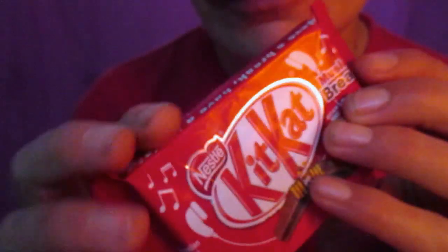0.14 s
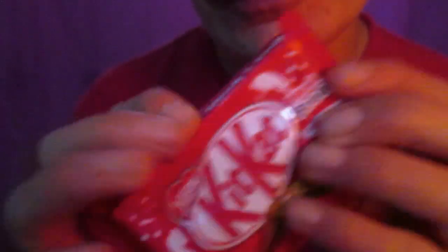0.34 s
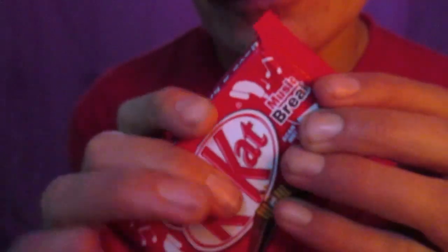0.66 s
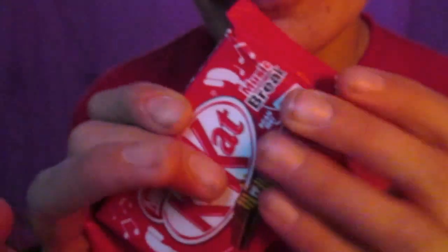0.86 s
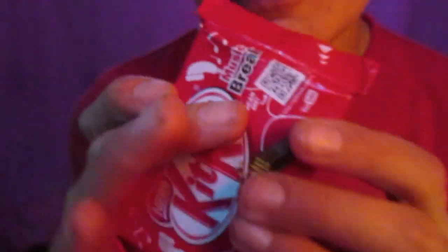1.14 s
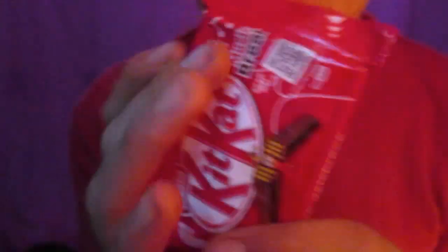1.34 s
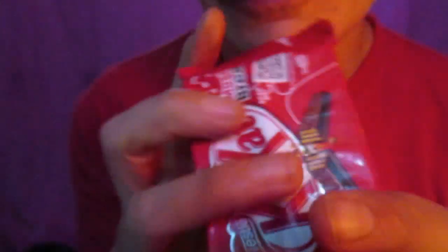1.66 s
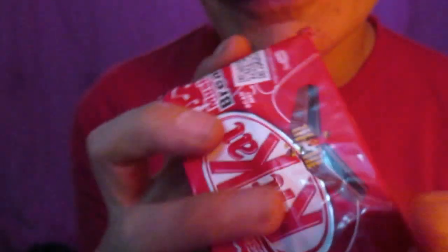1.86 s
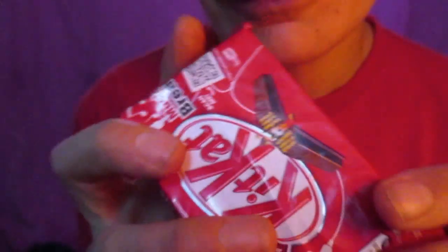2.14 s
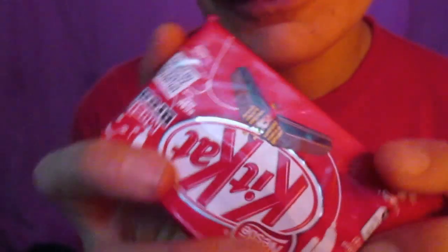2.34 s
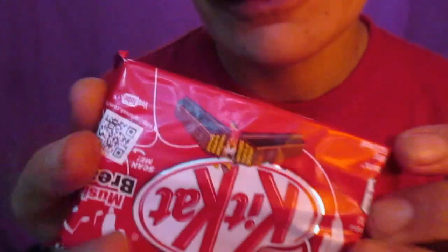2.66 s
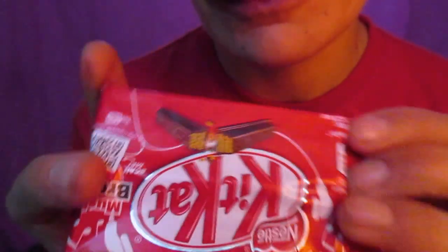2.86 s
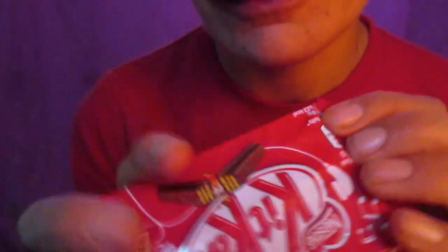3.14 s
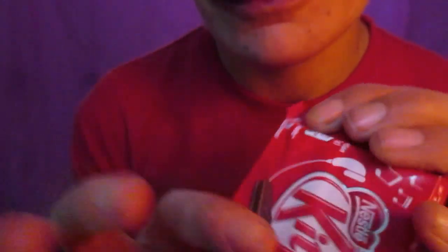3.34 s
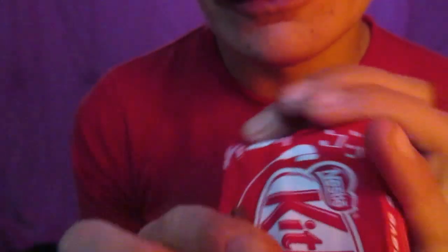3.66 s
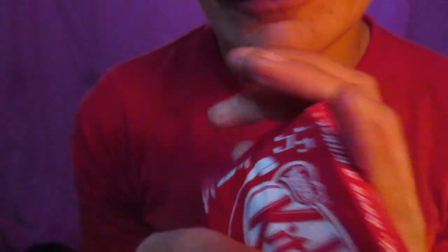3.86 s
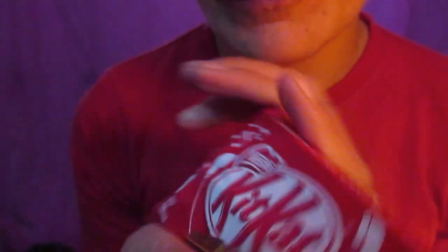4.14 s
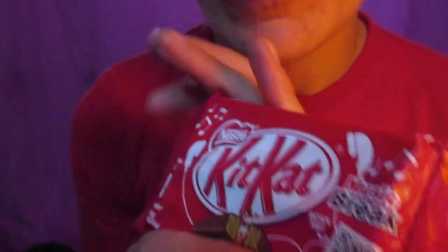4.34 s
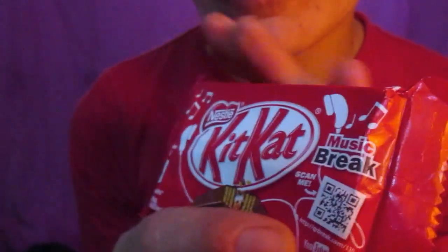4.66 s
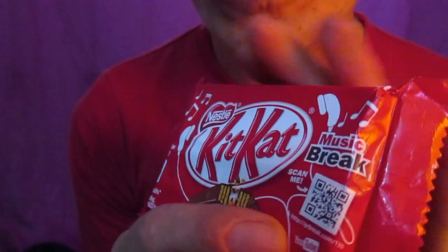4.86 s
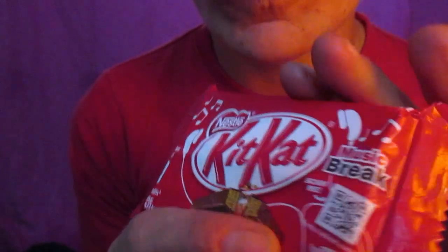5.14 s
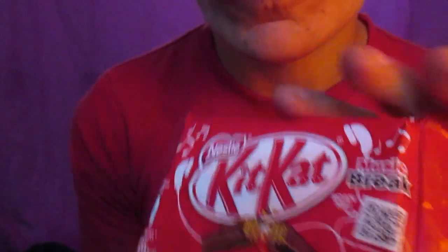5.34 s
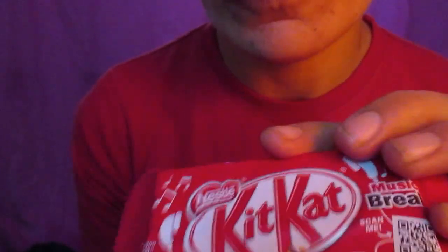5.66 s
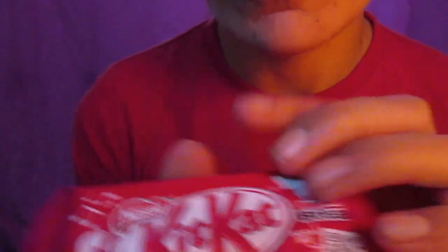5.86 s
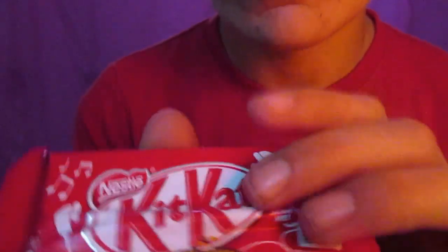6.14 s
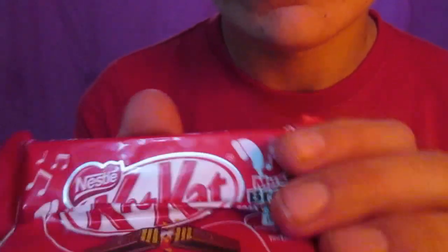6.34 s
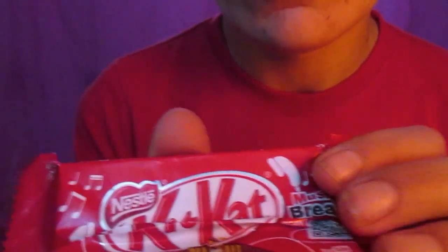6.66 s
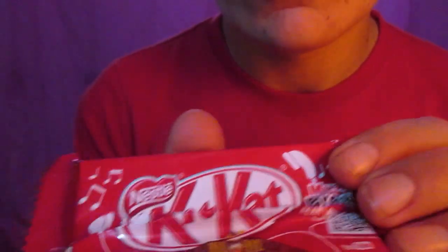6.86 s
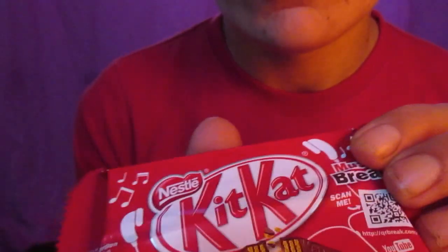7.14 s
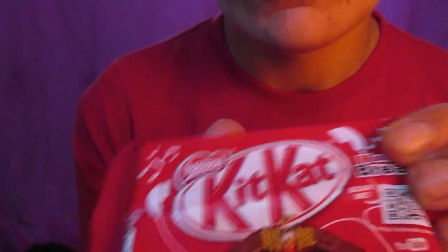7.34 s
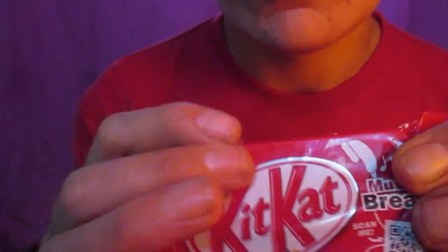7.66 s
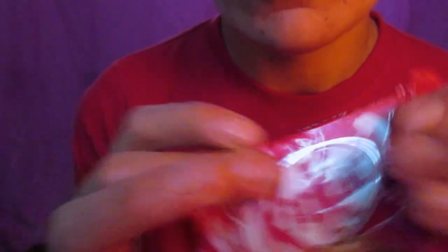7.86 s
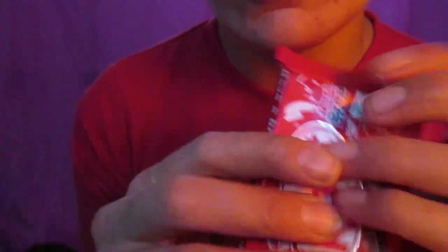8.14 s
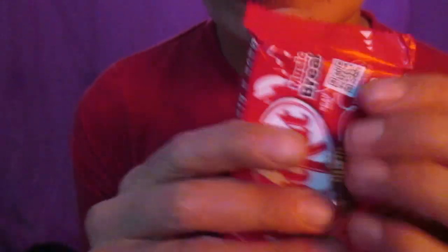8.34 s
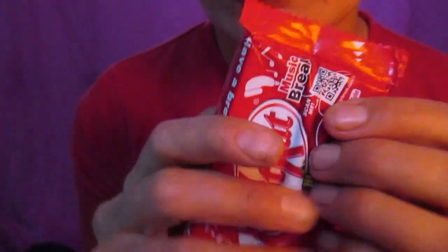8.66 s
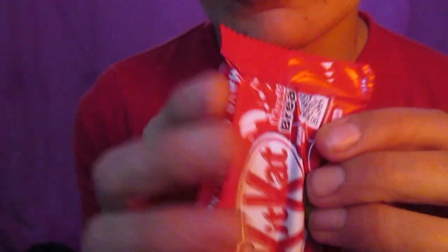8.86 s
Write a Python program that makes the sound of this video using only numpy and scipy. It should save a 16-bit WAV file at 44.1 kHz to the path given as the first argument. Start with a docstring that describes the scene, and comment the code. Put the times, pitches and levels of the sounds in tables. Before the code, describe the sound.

Fingers turn and press a wrapped chocolate bar up close: bright film crackles, brief dry rustles, soft thuds, faint rumble and hiss behind.

```python
"""A faint grainy rustle of fingertips on thin plastic film, then bright snaps as a wrapped chocolate bar
is turned and pressed close to a microphone in a quiet room. Creases give way as sharp breaks with a jerky
shudder, each ringing a small facet of film; sliding skin trips clouds of tiny ringing wrinkles.
Now and then a finger bumps the bar: a short damped burst of noise. Soft reflections, low rumble and
faint hiss, made of filtered noise, lie around and underneath."""
import sys
import numpy as np
from scipy import signal
from scipy.fft import rfft, irfft
from scipy.io import wavfile
from scipy.ndimage import uniform_filter1d

SR = 44100
rng = np.random.default_rng(int(sys.argv[2]) if len(sys.argv) > 2 else 0)


def to_wav(s):
    """Save 16-bit WAV."""
    ch = np.atleast_2d(s).T  # columns
    pcm = np.round(np.clip(ch, -1, 1) * 32767)  # PCM
    wavfile.write(sys.argv[1], SR, pcm.astype(np.int16))


N = 396459

# The loud creases snapping.
# Each row: time of the break in seconds, nominal level in dB, length of the slip in ms, ring pitch in Hz,
# brightness in dB per octave, air pocket relative to the level in dB.
LOUD_SNAPS = [(0.0724, -48.5, 0.2, 9860.0, 4.5, -20.5), (0.137, -43.5, 2.8, 724, 11, 1),
              (0.142, -49, 1.2, 714, 5, 1.0), (0.2976, -46.5, 1.2, 818.0, 5, -1.5),
              (0.361, -33.5, 2.6, 4820.0, -7.5, -5.5), (0.3887, -41, 0.81, 2670.0, 2, -6),
              (0.431, -42.5, 0.86, 4980, -3, -20), (0.4986, -41, 1.4, 689.0, 10, -0.5),
              (0.5106, -30.5, 0.56, 2520, 6.5, -15), (0.5532, -36.5, 1.9, 1720.0, 9, -7.5),
              (0.5696, -33.5, 1, 3180, 1.5, -16.0), (0.5772, -40, 0.4, 5170.0, 0.0, -14),
              (0.6143, -38.0, 1.6, 4220, -1, -11), (0.681, -37.0, 1.6, 6040, -5.5, -13),
              (0.762, -37.5, 2.3, 5370, 3, -21.0), (0.8577, -35.5, 0.79, 3400, 3, -14),
              (0.905, -43, 3.7, 8850, -8, -21), (0.9216, -41, 0.64, 7600, -9, -22),
              (0.991, -42.0, 2.9, 7240.0, -8.5, -19), (1.128, -45, 1.0, 2970.0, -4, -5.0),
              (1.225, -44, 1.8, 1650, -1, -17.0), (1.2602, -37, 2.0, 1790.0, 8.5, -9.5),
              (1.284, -41.5, 1.16, 2850, 5, -14), (1.3616, -38.5, 0.66, 6650, -3.5, -15),
              (1.4034, -26.5, 1.4, 6220, 0, -25.0), (1.411, -22.5, 1.15, 3180, 7, -29),
              (1.4416, -23.5, 1.2, 5780, -3, -22), (1.4491, -25.5, 2, 1570, 1, -9),
              (1.4739, -28.5, 1.9, 1650, -4, -10.0), (1.4836, -32, 0.49, 2640, 2, -11),
              (1.5103, -36.5, 0.93, 7690.0, -3.5, -15.0), (1.5207, -32, 0.99, 7540.0, -6.5, -16),
              (1.5694, -36.5, 0.22, 7250, -4.5, -28.0), (1.6255, -42, 2.5, 3020, 3.0, -23),
              (1.6999, -35, 1, 2895, 3.0, -10.5), (1.7708, -34.5, 1.06, 3070, 2.5, -16),
              (1.871, -37.5, 0.91, 3020, 1, -8.5), (1.9053, -44.0, 0.66, 5670, -0.5, -13),
              (1.9677, -43.0, 0.49, 8960, -9, -10.0), (1.995, -41.5, 0.5, 7800, -6, -15.0),
              (2.054, -42.0, 1.2, 2510, 2, -18), (2.0709, -26.5, 0.56, 6410, -2.5, -9),
              (2.1129, -47, 0.8, 2800, 0, -13), (2.292, -44, 1.2, 1862, 7.5, -3.5),
              (2.4063, -24.5, 1.2, 2180, 5, -10.5), (2.4656, -30.5, 0.25, 2630, 5, -31),
              (2.5422, -26, 1.13, 1511, 6, -2), (2.6481, -42, 2.3, 3950, 6, -8.0),
              (2.654, -28.5, 0.2, 4240, 5.5, -17), (2.801, -34.5, 0.24, 6860, -6, -8),
              (2.8069, -33, 0.3, 1850, 9, -12), (2.816, -29.5, 0.64, 1740, 7, -14.0),
              (2.9826, -35.5, 1.2, 2640, 2, -15), (2.9945, -39, 1.6, 1440, 5, -3),
              (3.0001, -31.5, 0.19, 7180, 2.5, -24), (3.0328, -34.5, 0.33, 4900, -1, -29.0),
              (3.0543, -29, 0.18, 7480, 1.5, -28), (3.0986, -34.0, 1.25, 1974, 6, -28.0),
              (3.1424, -32, 0.53, 8200, -2, -16), (3.1638, -35, 0.69, 6960, -5, -12),
              (3.2202, -35, 2.13, 1562, 5, -17), (3.2328, -43, 0.29, 813, 13, -2.5),
              (3.3067, -42.5, 0.69, 9810, -10, -13), (3.4909, -47.5, 0.2, 5780, -4, -19),
              (3.688, -36.5, 0.34, 5730, -3.5, -7), (3.764, -47, 3, 1482, 11, 0.5),
              (3.8172, -36.5, 0.3, 7750, -5, -12.5), (3.8674, -36.5, 0.3, 4910, -2.5, -9.5),
              (3.9445, -43.5, 1.5, 748, 7.5, 2.5), (4.2028, -40.5, 0.29, 2980, 4, -10),
              (4.4399, -37.0, 2.75, 1497, 9, -13), (4.5184, -38.5, 1.6, 4486, -3, -12),
              (4.5867, -42.5, 0.15, 3070, 1, -13.0), (5.3737, -35, 1.85, 2038, 7.5, -7.5),
              (5.5166, -43.5, 1.77, 740, 3.5, 2.0), (5.5602, -40, 0.36, 7560.0, -4, -3),
              (5.7111, -40.5, 1.24, 775, 15, 5.5), (5.7592, -30.5, 0.12, 5870, 0, -25),
              (5.775, -42.5, 0.88, 1502, -9, -6), (5.8336, -32, 1.33, 1630, 4, -6),
              (5.9236, -39, 1.2, 6440.0, -6.5, -15), (6.055, -38, 0.19, 5860.0, -4, -6.5),
              (6.2122, -19.5, 0.69, 4360, 2.5, -21), (6.221, -28.5, 0.42, 4640, -0.5, -29),
              (6.2437, -31.5, 3.2, 704, 9.5, -1), (6.2596, -43, 2.66, 628, 4.5, 9.5),
              (6.3156, -47, 2.8, 1380.0, 6, -16), (6.4879, -47, 0.2, 9400, 9, -22),
              (6.694, -41, 0.46, 1810, 8.5, -6), (6.8143, -43, 0.39, 8730, -6.5, -6),
              (6.8403, -44, 1.2, 753, 2.5, 2), (6.8642, -29.5, 0.74, 5840.0, -2.5, -14.5),
              (6.8686, -42, 1.3, 1600, 5, -3), (6.9664, -33, 0.44, 2970, -0.5, -24),
              (6.9906, -35, 0.092, 6000, -0.5, -32), (7.0577, -39.5, 0.68, 1820, 4.5, -5.5),
              (7.2063, -46, 1.74, 790, 11.5, 1.5), (7.2755, -46.5, 0.8, 794, 12, -4),
              (7.2887, -39, 0.32, 5930, -1.5, -11), (7.4392, -40.5, 1.45, 8630, -8.5, -8),
              (7.5804, -22, 2.33, 1656, -16, -27), (7.591, -41, 2.2, 571, -3, -1.0),
              (7.5971, -32.5, 1.08, 1680, 9, -9), (7.6128, -32, 0.94, 1710, 6.5, -12),
              (7.6403, -29.5, 1.8, 1816, 6.5, -5), (7.6758, -42, 0.52, 4650.0, -3.5, -19),
              (7.7009, -40, 1.1, 4370.0, -2, -16), (7.754, -37.5, 0.86, 6200, -5, -13),
              (7.8983, -42.5, 0.61, 6380, -8.5, -4), (7.957, -19.5, 0.59, 4306, 4, -25.5),
              (7.974, -35, 0.92, 1670, 9, -6), (8.0175, -37.5, 0.19, 7470, -5, -15.0),
              (8.035, -36.5, 1.1, 2050.0, 8, -4), (8.0691, -28, 0.42, 1760, 9.5, -12.5),
              (8.0977, -34, 1.43, 1820, 3, -12.0), (8.116, -32.5, 0.58, 1510.0, 9.5, -8.0),
              (8.1477, -38, 0.97, 790, 4, -4), (8.1942, -36.5, 0.9, 7530, -6, -15),
              (8.236, -37.5, 0.23, 4570, -1, -14), (8.2559, -34.5, 1.2, 1860, 5, -10),
              (8.2883, -29, 1.5, 804, 10.5, -3.5), (8.3039, -31.0, 0.96, 4110.0, 4, -9.0),
              (8.3272, -38.5, 0.84, 4100, 5, -24), (8.344, -30.5, 0.26, 4500.0, 0, -23),
              (8.3469, -30, 0.18, 4570.0, -0.5, -18), (8.362, -31, 0.2, 7600.0, 1, -31),
              (8.4097, -33.0, 0.66, 3150, 9.5, -7.5), (8.4176, -38.5, 0.94, 9070.0, -6, -5),
              (8.4664, -37.5, 0.5, 11300.0, -7.5, -7.0), (8.5022, -24.5, 0.51, 7710.0, -7.5, -10.0),
              (8.5136, -20.5, 0.44, 8740, -2.5, -3.5), (8.6175, -38, 0.6, 730, 8.5, 0.5),
              (8.6331, -41.5, 1.05, 668.0, 6, 1), (8.7724, -40.5, 2.4, 4170, -5.0, -9),
              (8.8383, -34.5, 0.31, 9230, -7, -9.0), (8.8758, -33.0, 0.2, 5570, -1, -19.0),
              (8.8937, -29, 0.73, 1844, 8.5, -11.0), (8.9661, -43.5, 0.35, 6270.0, -5, -8.5)]
# What a snap shakes: air pocket under the film, wide panel, small facet, crack of the crease, its sharp edge.
# Each row: low edge in Hz, high edge in Hz.
SHAKEN_PARTS = [(350, 1020), (1300, 2250), (2500, 5850), (5600, 10100), (11000, 14600)]
# How sharp an ordinary snap's edge is, depending on the facet that rings.
# Each row: ring pitch in Hz, edge relative to the crack in dB.
EDGE_SHARPNESS = [(700, -9), (3000, -17), (4500, -13.5), (6000, -15), (7500, -16), (9000, -9.5), (11300, 0)]
FOCUS_DB_PER_OCT = 10   # how fast the energy falls away from the ring pitch


def snaps(rows, ring_db, pocket_db=1.3, panel_db=1.0, facet_db=0.1, crack_db=1.63,
          edge_growth=0.19, ordinary_db=-40.0):
    """Each snap shares its energy among the parts of the wrapper, favouring those near its pitch."""
    times, loud_db, slips_ms, rings_hz, bright_db, air_db = np.transpose(rows)
    forces = np.array([buckle(ms, hz, ring_db) for ms, hz in zip(slips_ms, rings_hz)])
    forces = close_pickup(forces)

    # panel, facet and crack split the energy by their distance from the ring pitch
    centres_hz = np.sqrt(np.prod(SHAKEN_PARTS[1:4], axis=1))
    octaves = np.log2(centres_hz[:, None] / rings_hz)
    shares_db = bright_db * octaves - FOCUS_DB_PER_OCT * np.abs(octaves)
    total_db = 10 * np.log10(np.sum(from_db(shares_db) ** 2, axis=0))
    panel, facet, crack = loud_db + shares_db - total_db

    # a harder break has a sharper edge
    edge = crack + np.interp(rings_hz, *np.transpose(EDGE_SHARPNESS))
    edge = edge + edge_growth * (crack - ordinary_db)
    levels_db = [loud_db + air_db + pocket_db, panel + panel_db, facet + facet_db, crack + crack_db, edge]

    sounds = 0
    for (low_hz, high_hz), level_db in zip(SHAKEN_PARTS, levels_db):
        part = band(forces, low_hz, high_hz, order=3)
        power = np.sum(part ** 2, axis=1) / (SR / 200)   # levels are rms over 5 ms
        sounds = sounds + part * (from_db(level_db) / np.sqrt(power))[:, None]

    out = np.zeros(N + SR)
    for s, sound in zip(times, sounds):
        start = max(round(s * SR) - SR // 500, 0)   # the break sits 2 ms into each sound
        out[start:start + len(sound)] += sound
    return out[:N]


def buckle(slip_ms, ring_hz, ring_db, ring_width=0.39, jerk_db=3.0):
    """One crease gives way: a sharp break and a jerky shudder; the slower the slip, the softer the break."""
    sharp_ms, shudder_ms = .85, .6 * max(slip_ms, .1)
    ms = np.arange(SR // 50) * 1000 / SR
    lead = SR // 500
    phase = np.maximum((ms - ms[lead]) / shudder_ms + .5, 0)
    jerks = rng.standard_normal(len(ms)) * from_db(jerk_db * rng.standard_normal(len(ms)))
    force = phase * np.exp(-phase) * jerks
    force *= slip_ms / sharp_ms / np.linalg.norm(force)
    force[lead] += 1   # the break itself
    return resonate(force * rng.choice([-1, 1]), ring_hz, ring_width * ring_hz, ring_db)


FIRM_DB = -48   # a stroke of ordinary firmness


def crackles(count=330, rate_follows=.42, level_follows=0.32, level_db=-48.0, spread_db=3.0, slip_ms=1.0,
             ring_hz=3000, spread_oct=0.87, bright_db=-0.5, pocket_db=-8.5):
    """Small creases give way at random, more often and louder under a firm stroke; rows like LOUD_SNAPS."""
    firmness = pressure(0) / from_db(FIRM_DB) ** 2
    chance = np.cumsum(firmness ** rate_follows)
    draws = (np.arange(count) + rng.random(count)) / count * chance[-1]
    at = np.searchsorted(chance, draws).clip(0, N - 1)
    size, slip, pitch, bright, pocket = rng.standard_normal((count, 5)).clip(-2, 2).T
    loud_db = level_db + level_follows * 10 * np.log10(firmness[at]) + spread_db * size
    slips_ms = slip_ms * 2 ** (.5 * slip)
    rings_hz = np.clip(ring_hz * 2 ** (spread_oct * pitch), 600, SR / 4)
    return np.transpose([at / SR, loud_db, slips_ms, rings_hz, bright_db + 2 * bright, pocket_db + 2 * pocket])


# Ranges of the rustle's air pocket, film and fizz.
# Each row: low edge in Hz, high edge in Hz.
RUSTLE_RANGES = [(370, 870), (1350, 7100), (5600, 12600)]
# Fingers sliding on the film.
# Each row: firmest moment in seconds, swell in seconds, fade in seconds, nominal level in dB,
# fizz relative to the level in dB, air pocket relative to the level in dB.
FINGER_STROKES = [(0.019, 0.036, 0.101, -55.5, -0.5, -2), (0.137, 0.025, 0.01, -47.5, -0.5, -2.0),
                  (0.36, 0.055, 0.036, -47.5, 1, -3.0), (0.579, 0.127, 0.352, -54.5, -8, -3),
                  (0.679, 0.015, 0.034, -47.5, -2, -7.0), (0.763, 0.033, 0.024, -51.5, -2, 3.5),
                  (0.915, 0.021, 0.035, -50.5, -1, -16), (0.99, 0.015, 0.045, -52.0, 0.0, -4),
                  (1.274, 0.062, 0.053, -47.0, 0.5, -10), (1.409, 0.008, 0.013, -32.0, -8, -21),
                  (1.447, 0.032, 0.035, -35.0, -4.5, -8), (1.519, 0.028, 0.07, -51.0, -5, -2),
                  (1.631, 0.032, 0.031, -44.5, -6, -15.0), (1.703, 0.022, 0.026, -45.0, -3, -1),
                  (1.753, 0.028, 0.027, -45.0, -10, 1), (1.841, 0.032, 0.067, -52.5, -11.0, -1),
                  (1.978, 0.02, 0.024, -51.5, -1, 2), (2.079, 0.031, 0.037, -49.5, -6, 0),
                  (2.381, 0.025, 0.03, -53.0, -11, 2), (2.403, 0.011, 0.02, -39.0, -10, -6),
                  (2.464, 0.009, 0.018, -46.0, -10, -15), (2.54, 0.082, 0.036, -48.0, 1, -17),
                  (2.651, 0.007, 0.014, -43.5, -3, -6), (2.794, 0.008, 0.063, -45.5, -5, -14),
                  (2.984, 0.033, 0.029, -43.0, -0.5, -10), (3.063, 0.034, 0.024, -56.0, 3, -4.0),
                  (3.156, 0.05, 0.015, -41.5, -6, -7), (3.208, 0.029, 0.024, -44.0, -5, -2),
                  (3.26, 0.016, 0.049, -51.0, -0.5, -5), (3.687, 0.032, 0.014, -48.5, -5, 2),
                  (3.713, 0.022, 0.058, -54.0, -5, -8), (4.441, 0.017, 0.007, -43.5, -4, -2.5),
                  (5.373, 0.014, 0.017, -50.0, -4, -2), (5.478, 0.05, 0.049, -52.5, -2, -2),
                  (5.581, 0.059, 0.034, -48.5, -3, 3), (5.714, 0.018, 0.138, -55.0, -10, -2),
                  (5.827, 0.025, 0.019, -48.0, -0.5, 0), (6.242, 0.022, 0.028, -37.5, -8, -7),
                  (6.681, 0.041, 0.037, -60.0, -5, 1.0), (6.871, 0.027, 0.02, -48.5, -7.0, 2.0),
                  (6.985, 0.025, 0.037, -53.5, -5.0, -3), (7.287, 0.015, 0.016, -52.5, -12, -2),
                  (7.406, 0.067, 0.046, -51.0, 0, -3.5), (7.59, 0.01, 0.017, -29.0, -9.0, -2),
                  (7.638, 0.024, 0.018, -44.5, -8, -8), (7.676, 0.026, 0.134, -55.0, -3, -10),
                  (7.903, 0.018, 0.027, -54.0, -7.0, -3), (7.971, 0.03, 0.028, -44.5, 0, -6.0),
                  (8.038, 0.024, 0.096, -42.0, -6, -3), (8.153, 0.012, 0.012, -42.0, 2, 1),
                  (8.202, 0.012, 0.013, -49.5, 5, -8.0), (8.307, 0.077, 0.028, -45.0, -5, 0),
                  (8.35, 0.011, 0.026, -42.5, -5, -4), (8.417, 0.021, 0.022, -50.5, -1, -6),
                  (8.516, 0.037, 0.035, -47.0, -0.5, -10), (8.654, 0.045, 0.036, -57.5, -4.0, 4.0),
                  (8.771, 0.036, 0.015, -48.5, -4.0, 0), (8.834, 0.052, 0.021, -48.0, 0, -5),
                  (8.898, 0.03, 0.035, -49.0, -4, 1), (8.986, 0.034, 0.034, -50.5, -3, -4.0)]
SWELL_SHAPE, FADE_SHAPE = 1.6, 1.5   # 1 = exponential, 2 = bell
GRIP_DB = -74   # the film stirs even when it is only held


def rustle(friction=0.28, pocket_db=-1.0, film_db=0.05, fizz_db=0.6):
    """Sliding skin trips countless wrinkles, over a smooth hiss of friction."""
    fizz, pocket = np.transpose(FINGER_STROKES)[4:]
    film = close_pickup(wrinkles() + friction * rng.standard_normal(N))
    colours_db = [pocket + pocket_db, film_db, fizz + fizz_db]
    out = 0
    for (low_hz, high_hz), colour_db in zip(RUSTLE_RANGES, colours_db):
        part = band(film, low_hz, high_hz, order=2)
        # the pressure of the hand, not the luck of the grains, sets the loudness
        part /= np.sqrt(uniform_filter1d(part ** 2, size=1300) + 1e-12)
        out = out + part * np.sqrt(pressure(colour_db))
    return out


def pressure(colour_db):
    """Power of the sliding: every stroke swells and fades; colour_db shifts each stroke's level for one range."""
    t = np.arange(0, N, 20) / SR
    times, swell_s, fade_s, level_db = np.array(FINGER_STROKES).T[:4, :, None]
    before = np.abs((t - times) / swell_s) ** SWELL_SHAPE
    after = np.abs((t - times) / fade_s) ** FADE_SHAPE
    away = np.where(t < times, before, after)
    peak_power = from_db(level_db + np.reshape(colour_db, (-1, 1))) ** 2
    power = peak_power * np.exp(-2 * np.minimum(away, 20))
    return np.interp(np.arange(N) / SR, t, from_db(GRIP_DB) ** 2 + power.sum(axis=0))


def wrinkles(per_s=3500, size_db=2.5, clump_db=4.0, shift_db=4.5, width=1.23, count=20):
    """Tiny wrinkles flip at random, in clumps; each rings for a few cycles at a pitch of its own."""
    sizes = from_db(size_db * np.minimum(rng.exponential(1, N), 4)) * rng.choice([-1, 1], N)
    flips = sizes * (rng.random(N) < per_s * from_db(clump_db * drift(150)) / SR)
    pitches = np.geomspace(420, 14000, count)
    weights = np.sqrt(pitches)   # small wrinkles are the commonest
    dealt = rng.choice(count, N, p=weights / weights.sum())
    out = 0
    for k, hz in enumerate(pitches):
        rings = band(rms_one(flips * (dealt == k)), hz / width, hz * width, order=1)
        out = out + rings * from_db(shift_db * drift(25))   # the colour shifts as the fingers move on
    return rms_one(out)


# Fingers bumping the bar.
# Each row: time in seconds (halfway up the swell), level in dB, pitch in Hz, rise of the swell in seconds.
FINGER_BUMPS = [(0.114, -49.5, 120, 0.0066), (0.351, -51, 130, 0.0072), (0.747, -48.5, 200, 0.023),
                (1, -41.5, 109.6, 0.007), (1.42, -48, 134, 0.011), (1.748, -54, 260, 0.0199),
                (2.065, -35.5, 215, 0.003), (2.407, -46, 152.3, 0.0037), (2.542, -29.5, 460, 0.0016),
                (2.775, -50, 130.7, 0.0096), (2.987, -42, 120.7, 0.0049), (3.934, -47, 86.4, 0.013),
                (5.829, -40.5, 107.4, 0.0049), (6.249, -38.5, 306, 0.0046), (7.589, -33.5, 407, 0.0026),
                (7.638, -47, 128, 0.0046), (7.967, -42.5, 174, 0.0072), (8.052, -50.5, 140, 0.019),
                (8.512, -31, 482, 0.00093)]


def bumps(width=1.58):
    """A soft fingertip pushes the bar: a dull, heavily damped thud of band-limited noise."""
    out, t = np.zeros(N + SR), np.arange(SR // 5) / SR
    for s, level_db, hz, rise_s in FINGER_BUMPS:
        swell = t / rise_s * np.exp(1 - t / rise_s)
        thud = band(swell * rng.standard_normal(len(t)), hz / width, hz * width)
        thud *= np.linalg.norm(swell) / np.linalg.norm(thud)
        start = round(s * SR - rise_s * SR / 2)
        out[start:start + len(t)] += from_db(level_db) * thud
    return out[:N]


# Fixed peaks and dips of the close pickup, colouring every sound of the film. # Each row: frequency in Hz,
# nominal width in Hz, peak or dip in dB.
PICKUP_COLOUR = [(644, 350, 4.5), (1203, 90, -12), (1720, 880, 8.5), (2330, 330, -6.5), (3120, 290, 2),
                 (3720, 130, -7.5), (4440, 870, 2.5), (6440, 2000, 2), (7600, 300, 4), (7540, 370, 0.5),
                 (8940, 250, 4), (14600, 9800, -11.5)]


def close_pickup(x):
    """Every sound of the film is coloured by the fixed peaks and dips of the close pickup."""
    for hz, width_hz, gain_db in PICKUP_COLOUR:
        x = resonate(x, hz, width_hz, gain_db)
    return x


# Reflections from near surfaces.
# Each row: delay in seconds, level in dB.
NEAR_ECHOES = [(.0046, -48), (.0087, -38), (0.01, -25), (0.0143, -43)]
ROOM_T60_S, ROOM_DB = 0.2, -20.5   # decay time, level of the tail


def room(x, onset_s=0.00071, low_hz=180, high_hz=12000):
    """A few near reflections, with the faint short tail of a furnished room as decaying noise."""
    t = np.arange(SR // 2) / SR
    tail = band(rng.standard_normal(len(t)), low_hz, high_hz, order=1)
    tail *= from_db(-60 * t / ROOM_T60_S) * (1 - np.exp(-(t / onset_s) ** 2))
    response = from_db(ROOM_DB) * tail / np.linalg.norm(tail)
    for delay_s, level_db in NEAR_ECHOES:
        response[round(delay_s * SR)] += from_db(level_db)
    return signal.fftconvolve(x, response)[:N]


# Spectrum of the quiet room's rumble and hiss.
# Each row: frequency in Hz, relative density in dB per Hz.
QUIET_SPECTRUM = [(12, -41), (20, -5), (93, -1.5), (150, -3.5), (204, -4), (319, -6.5), (347, -7.5),
                  (607, -10.5), (897, -12), (1120, -15.5), (1370, -17.5), (1480, -16), (4300, -25),
                  (11400, -28.5), (16000, -39)]
QUIET_DB = -53   # rms of the whole background


def background():
    """Steady rumble of the room and hiss of the microphone: noise shaped to one spectrum."""
    hz, level_db = np.transpose(QUIET_SPECTRUM)
    bins_hz = np.maximum(np.fft.rfftfreq(N, 1 / SR), 1)
    colour = from_db(np.interp(np.log(bins_hz), np.log(hz), level_db))
    noise = irfft(rfft(rng.standard_normal(N)) * colour, N)
    return from_db(QUIET_DB) * rms_one(noise)


def from_db(db):
    """Decibels to amplitude."""
    return 10 ** (np.asarray(db) / 20)


def rms_one(x):
    """Scale to an rms of 1."""
    return x / np.sqrt(np.mean(x ** 2) + 1e-20)


def band(x, low_hz, high_hz, order=2):
    """Causal band-pass."""
    edges_hz = [low_hz, min(high_hz, .45 * SR)]
    return signal.sosfilt(signal.butter(order, edges_hz, "band", fs=SR, output="sos"), x + 1e-18)


def resonate(x, hz, width_hz, gain_db):
    """A peak or a dip around one frequency."""
    height, damping = from_db(gain_db / 2), np.pi * width_hz / SR
    turn = -2 * np.cos(2 * np.pi * hz / SR)
    zeros = [1 + damping * height, turn, 1 - damping * height]
    poles = [1 + damping / height, turn, 1 - damping / height]
    return signal.lfilter(zeros, poles, x)


def drift(rate):
    """Smooth chance with an rms of 1 that heads for a new value rate times a second."""
    knots = rng.standard_normal(N // 20)
    return rms_one(np.interp(np.arange(N) * rate / SR, np.arange(len(knots)), knots))


def scene():
    """The handled wrapper in its room; a facet beams its ring forward, so the walls get a plainer crack."""
    fingers = rustle() + bumps() + snaps(crackles(), ring_db=7.03)
    direct = snaps(LOUD_SNAPS, ring_db=11.685) + fingers
    scattered = snaps(LOUD_SNAPS, ring_db=7.315) + fingers
    return (direct + room(scattered) + background())[None]


CUTOFF_HZ = 16000


def record(dry):
    """The top is cut steeply by an elliptic low-pass."""
    return signal.sosfilt(signal.ellip(10, .1, 80, CUTOFF_HZ, fs=SR, output="sos"), dry)


dry = scene()
out = record(dry)
to_wav(out)
```